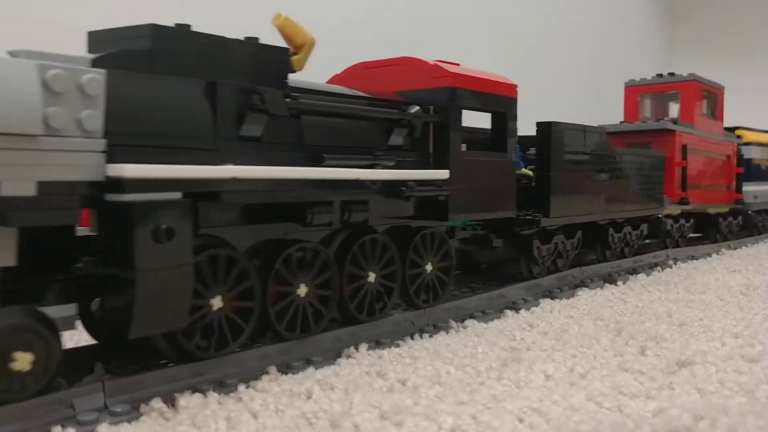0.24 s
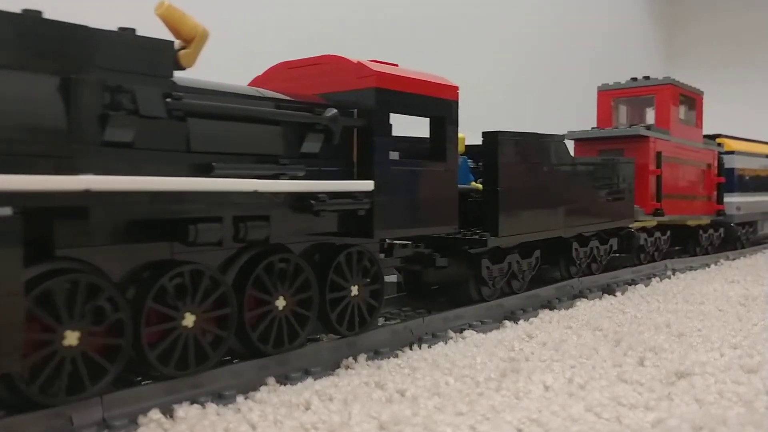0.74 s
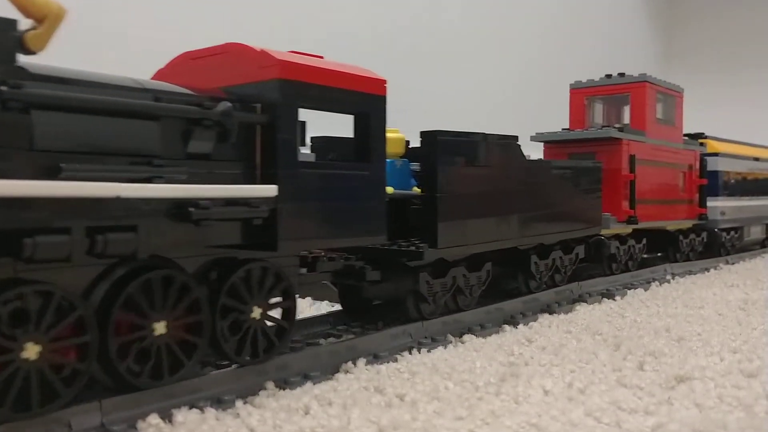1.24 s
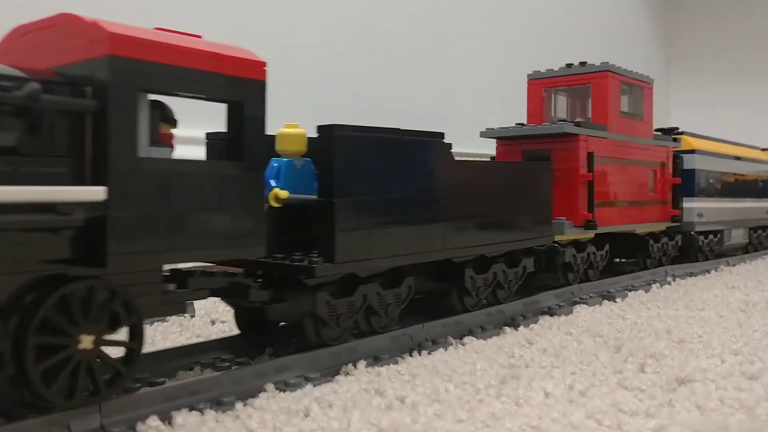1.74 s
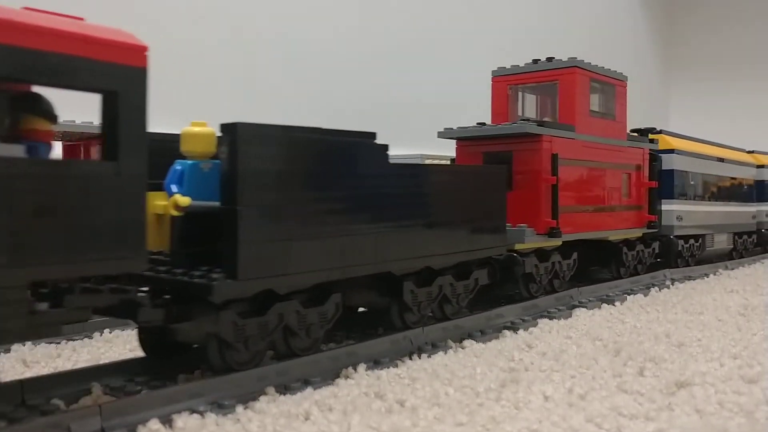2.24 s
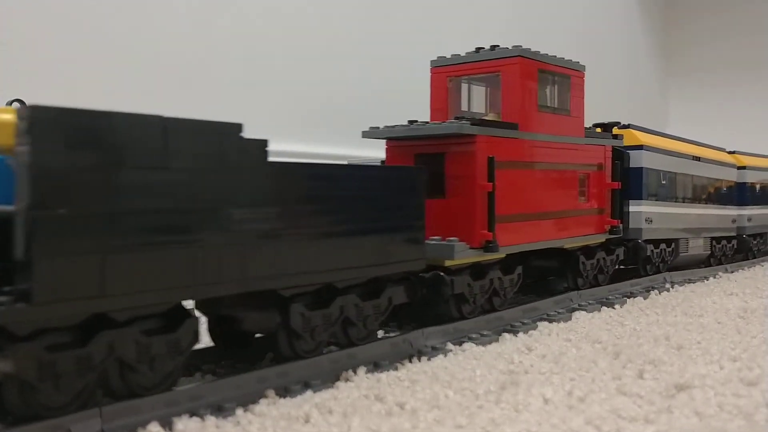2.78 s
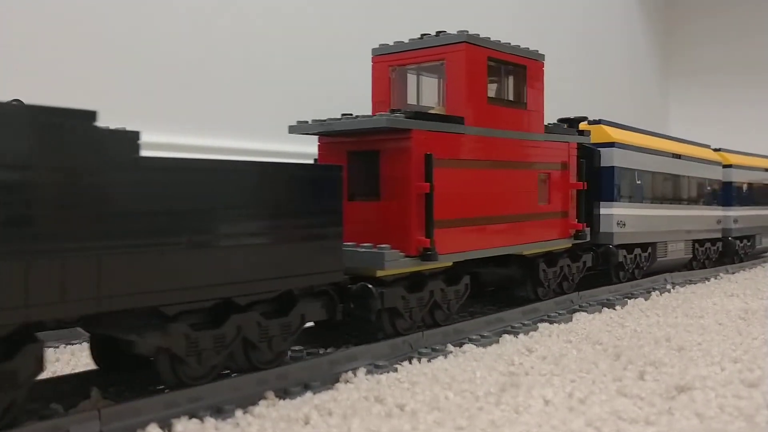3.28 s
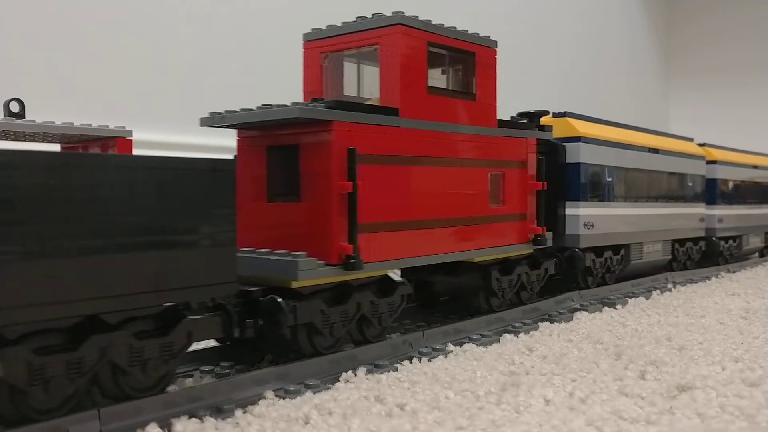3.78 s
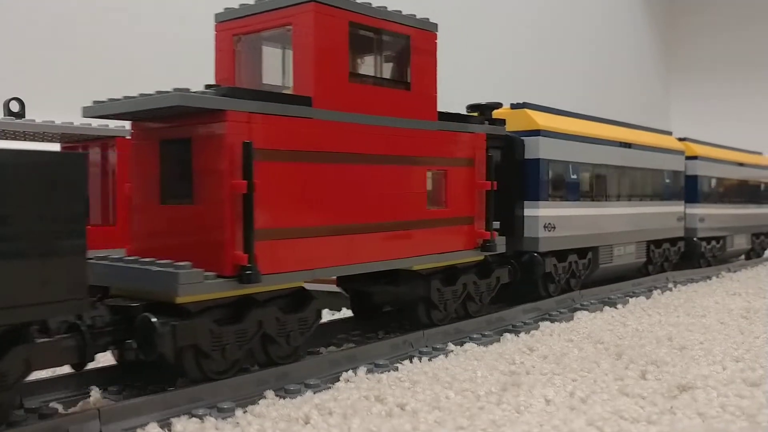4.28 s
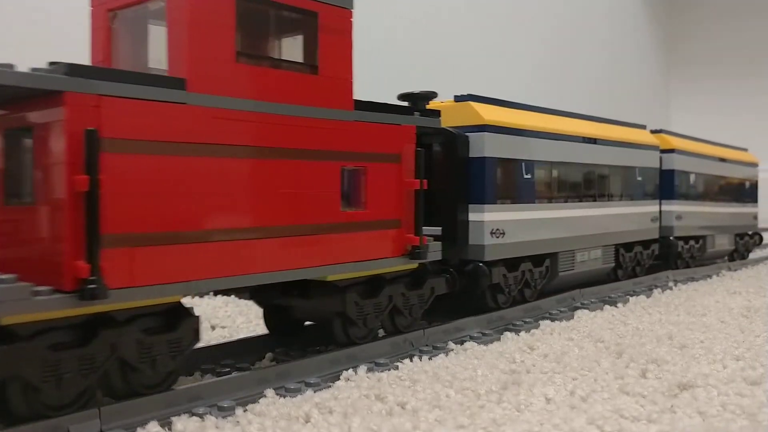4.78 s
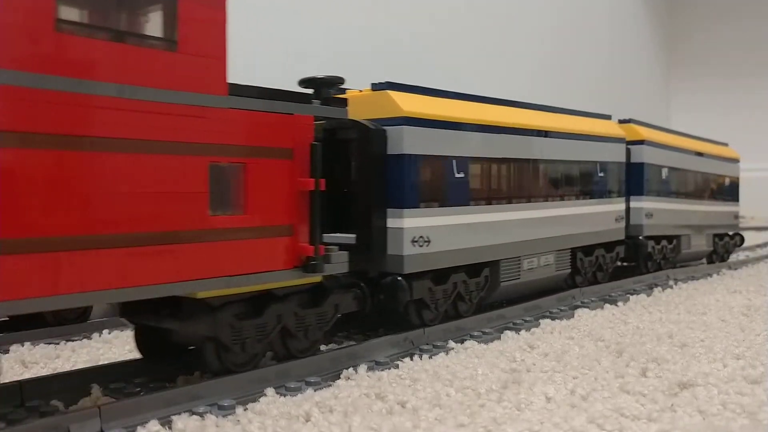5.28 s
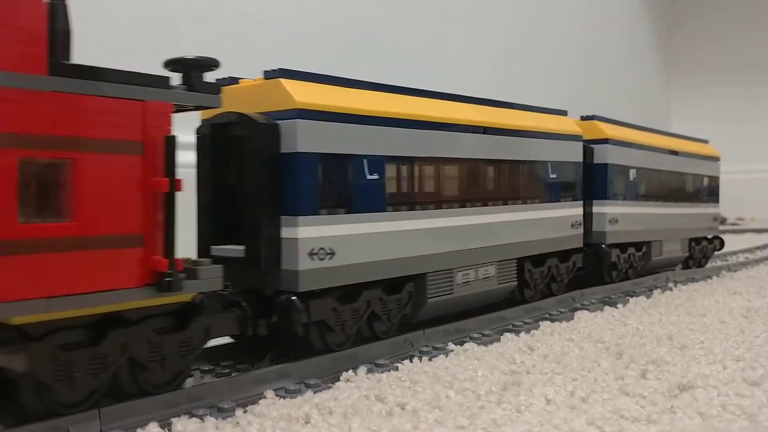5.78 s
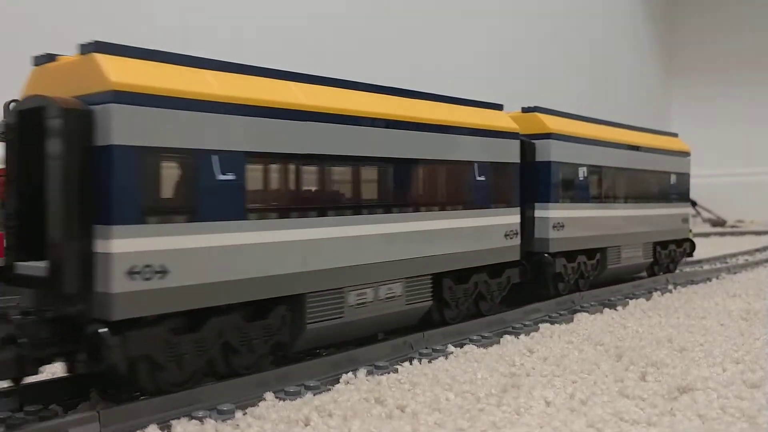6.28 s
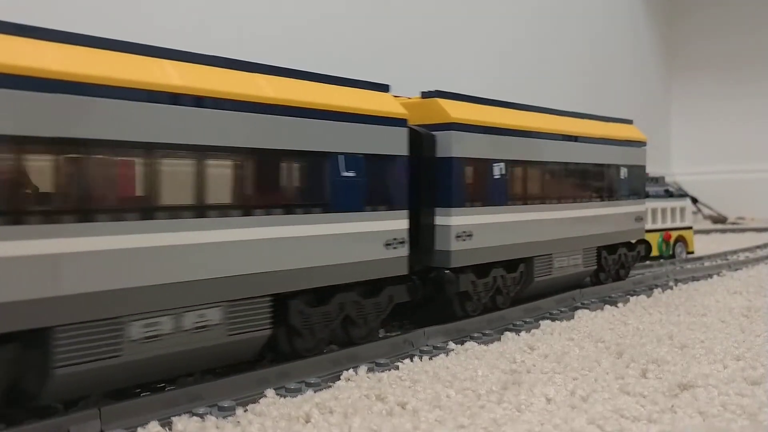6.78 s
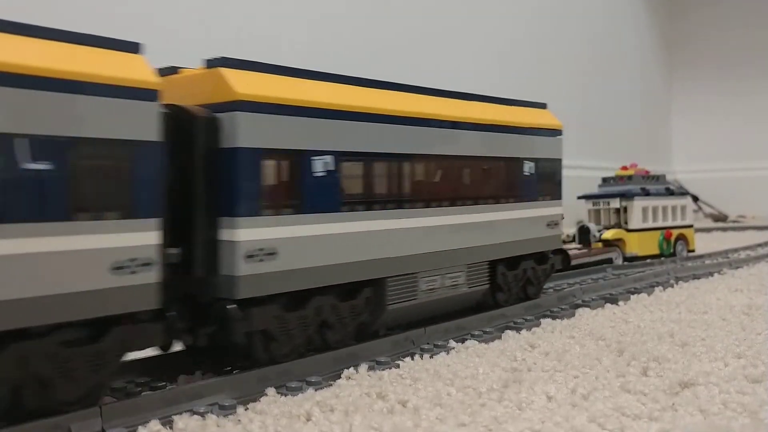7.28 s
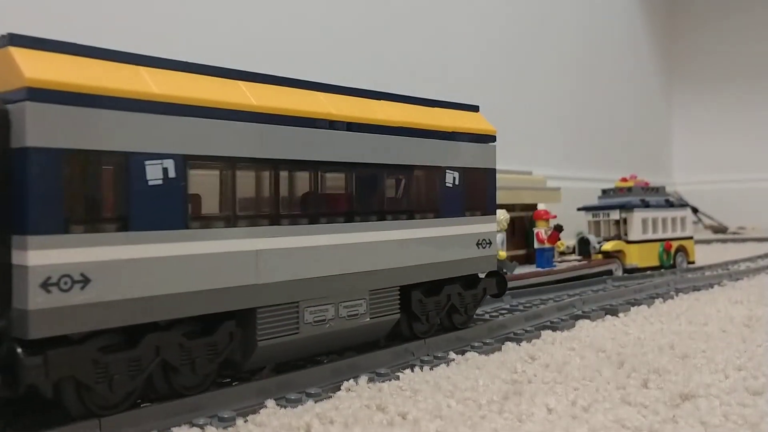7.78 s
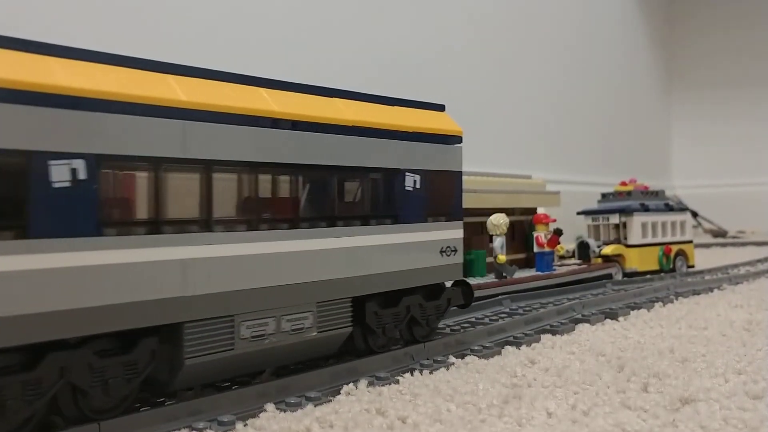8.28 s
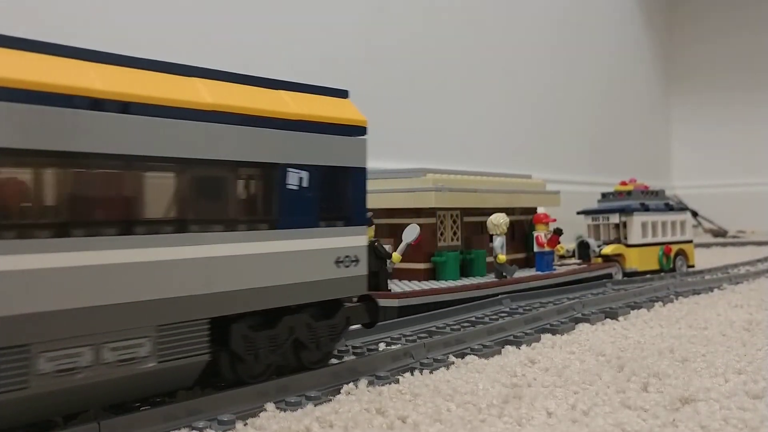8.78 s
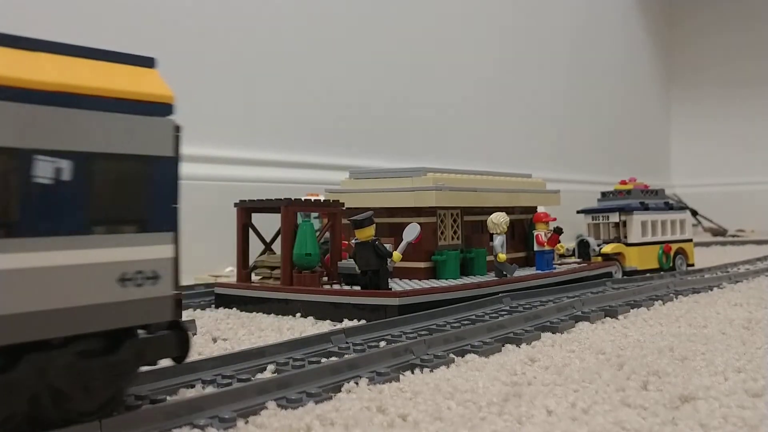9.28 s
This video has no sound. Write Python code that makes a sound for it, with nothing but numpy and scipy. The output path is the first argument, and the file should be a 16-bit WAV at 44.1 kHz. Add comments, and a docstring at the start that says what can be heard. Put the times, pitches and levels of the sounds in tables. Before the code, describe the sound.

A motorised plastic brick train rolls close past a microphone on the carpet of a small room. Wheels grind and patter unevenly, joints knock and clack, and short piercing squeals recur about every half second to second. The first part has low flange chirps; the longer carriages rattle harder, peaking in a bright clatter just after seven seconds, then easing to sparse knocks. One side is clear, the other muffled and rumbly.

```python
"""A toy train of plastic bricks grinds and knocks past, with high squeals and low swooping tones now and then.
Rail roughness, joints and jolts excite the wheels, the hollow bricks and the track, which answer at their own
modes; a dry axle squeals by stick-slip, flanges chirp, scraping wheels rasp, and a thin motor whine lies on
top. Left is an open microphone port on the carpet of a small room, with a low hum and drone in the air; right
is a covered port: the same train muffled, with the rumble and one thump of the floor, and low swooping tones."""
import sys
import numpy as np
from scipy import signal
from scipy.fft import rfft, irfft
from scipy.io import wavfile

SR = 44100
rng = np.random.default_rng(int(sys.argv[2]) if len(sys.argv) > 2 else 0)


def generate_wav(sig):
    """Save sig (samples, or channels by samples) to the path in sys.argv[1] as 16-bit PCM at SR."""
    pcm = np.round(np.clip(np.atleast_2d(sig).T, -1, 1) * 32767).astype(np.int16)
    wavfile.write(sys.argv[1], SR, pcm)


N = 420713
TIME = np.arange(N) / SR

# Levels are relative wherever a source applies a further gain.
# grinding of the wheels on the rails: (time [s], relative level [dB])
ROLLING_LEVEL = [(0.0, -70), (0.29, -71), (0.69, -74.5), (1.03, -70.5), (1.22, -74), (1.59, -65.5),
                 (1.91, -72.5), (2.63, -69), (3.16, -70.5), (3.34, -81), (3.55, -81.5), (3.74, -74),
                 (5.05, -69), (5.34, -66.5), (5.77, -69), (6.06, -68), (6.54, -61.5), (6.75, -63),
                 (6.93, -59.5), (7.17, -55.5), (7.25, -54.5), (7.46, -63), (7.62, -66.5), (7.72, -81),
                 (7.92, -82.5), (8.1, -77.5), (9.11, -66.5), (9.54, -69)]
# wheels meeting joints, couplings and bricks touching:
# (time [s], knock [dB], clack [dB], crack [dB], tick [dB]), all relative
CONTACTS = [(0.0578, -61, -52, -74.5, -99), (0.107, -83, -67.5, -78, -99), (0.471, -73, -80, -85, -78),
            (0.6855, -68, -65, -83, -61), (0.737, -82, -79, -78.5, -76), (0.8228, -65.5, -62, -66, -72),
            (0.8724, -58.5, -76, -57.5, -69.5), (0.9263, -52.5, -60, -68, -58),
            (0.9847, -55.5, -54, -65, -73), (1.095, -75, -66, -88, -99), (1.4862, -54.5, -52.5, -73.5, -69),
            (1.689, -62.5, -58, -82, -99), (1.7333, -57.5, -49, -47.5, -53.5),
            (1.795, -61.5, -58, -78, -99), (1.823, -71, -65, -84, -99), (1.8756, -58.5, -48.5, -46, -56),
            (1.9316, -63.5, -53, -36, -42.5), (1.934, -66, -58, -49, -43), (2.113, -58, -69, -77, -99),
            (2.3865, -64.5, -59, -71, -99), (2.4614, -67, -55, -75, -99), (2.5663, -55, -67, -82, -99),
            (2.7053, -62, -63.5, -73, -99), (2.7624, -47.5, -58, -71, -92), (2.965, -59, -70, -73, -99),
            (3.0423, -69, -66, -58, -79), (3.137, -63, -65, -70, -87), (3.269, -60, -74.5, -88, -99),
            (3.5956, -57, -66, -84, -69), (3.691, -71, -64.5, -86, -99), (3.7388, -66.5, -58.5, -61, -69.5),
            (3.775, -72, -64, -75, -99), (3.8896, -66.5, -63, -72, -84), (3.94, -58.5, -65, -89, -99),
            (4.0212, -56, -78, -66, -69), (4.12, -64, -81, -90, -99), (4.2533, -45, -55, -40.5, -52.5),
            (4.2842, -57.5, -60, -53, -61), (4.3276, -53, -48, -46, -84), (4.427, -61, -63.5, -82, -99),
            (4.4947, -58.5, -67.5, -73, -99), (4.641, -66, -72, -89.5, -99), (4.6798, -53, -76.5, -72, -74),
            (4.7616, -57, -50, -64.5, -57.5), (4.834, -59, -59.5, -73, -73), (4.88, -64, -63, -78, -99),
            (4.916, -58.5, -66, -82, -99), (4.935, -66, -71, -70, -65), (4.987, -54, -63, -64, -86),
            (5.0542, -59, -49, -57, -84), (5.1238, -64, -59, -57, -91), (5.1502, -67.5, -52, -50, -80),
            (5.198, -74, -60, -63, -60), (5.2081, -69, -56, -56, -45.5), (5.3667, -66, -58, -53, -80),
            (5.3902, -56, -48, -64, -73), (5.4138, -56.5, -39.5, -38, -56), (5.715, -61.5, -72, -75, -99),
            (5.7871, -50, -58.5, -68, -88), (5.9284, -56.5, -67, -60.5, -88), (6.0062, -51, -68, -57, -89),
            (6.147, -56, -62, -59, -71), (6.215, -70, -66, -61, -70), (6.322, -55, -54, -61, -74),
            (6.4408, -59.5, -57, -52, -62), (6.4497, -50.5, -50, -43.5, -54.5),
            (6.504, -49.5, -52, -47, -70), (6.531, -53, -51.5, -57, -83), (6.6036, -48, -43.5, -47.5, -64),
            (6.6562, -45.5, -50, -47.5, -62), (6.6826, -68, -57, -48, -55.5), (6.6982, -54, -54, -45, -63),
            (6.8392, -44.5, -56, -42.5, -57.5), (6.8733, -50, -57, -41.5, -62),
            (6.9546, -64, -52, -56, -64.5), (7.087, -52, -55, -47, -56.5), (7.114, -54, -60, -45, -58.5),
            (7.1431, -60, -55.5, -44, -56), (7.1823, -45, -61.5, -42, -69), (7.236, -45.5, -60, -47.5, -59),
            (7.2519, -47, -45, -29.5, -40.5), (7.2583, -55, -50.5, -41, -36.5),
            (7.269, -50, -47, -35, -41.5), (7.284, -50, -53.5, -36, -41.5), (7.3291, -54, -61, -50, -47),
            (7.3635, -46, -51.5, -53, -54), (7.379, -44, -58, -45, -54.5), (7.5187, -52, -62, -61, -82.5),
            (7.5703, -61, -68, -66, -61), (7.5862, -51, -71, -72, -66), (7.9612, -41.5, -62.5, -56, -50.5),
            (7.968, -45.5, -64, -59, -55), (7.9937, -44.5, -60, -54, -72), (8.011, -54, -57, -56, -66),
            (8.28, -91, -96, -88, -71.5), (8.3196, -57.5, -65, -67, -57.5),
            (8.3931, -54.5, -53, -60.5, -74), (8.4959, -62, -57, -55, -61.5),
            (8.515, -57.5, -61.5, -63, -68), (8.6602, -52, -81, -82, -99), (8.705, -58, -58.5, -58.5, -64),
            (8.7325, -46, -47, -42.5, -74), (9.1106, -47, -54, -48, -70.5),
            (9.1591, -48.5, -49.5, -52, -73), (9.2458, -68, -62, -54.5, -63.5),
            (9.3389, -48.5, -62, -45.5, -74), (9.402, -57.5, -62.5, -74, -91), (9.4529, -52, -66, -59, -95)]
# a bogie jolts and its parts shudder: (time [s], body level [dB], bright level [dB], decay time [s])
CLATTERS = [(0.824, -58.5, -84, 0.077), (0.928, -50, -56, 0.046), (1.42, -54.5, -85.5, 0.056),
            (1.516, -53, -95, 0.055), (2.14, -60, -94, 0.13), (2.399, -59.5, -65, 0.051),
            (2.455, -57, -74.5, 0.013), (2.764, -48.5, -69, 0.014), (2.85, -50, -59.5, 0.019),
            (3.566, -57, -85, 0.12), (3.74, -67, -63, 0.038), (4.257, -55, -49.5, 0.076),
            (4.748, -58, -54, 0.043), (4.934, -65, -61, 0.066), (5.054, -70, -62, 0.015),
            (5.15, -73, -61, 0.035), (5.198, -63, -53, 0.074), (5.409, -46.5, -44.5, 0.014),
            (6.321, -54.5, -61, 0.13), (6.451, -52.5, -58, 0.067), (6.702, -58, -56, 0.058),
            (6.955, -50.5, -56, 0.25), (7.257, -44.5, -29.5, 0.049), (7.355, -43.5, -57, 0.036),
            (7.927, -58, -96, 0.041), (7.962, -54.5, -56, 0.041), (8.115, -44.5, -84, 0.0035),
            (8.322, -60.5, -57.5, 0.12), (8.447, -51, -61, 0.046), (8.725, -45.5, -50, 0.015),
            (8.911, -57, -64, 0.11), (9.159, -66, -60, 0.028), (9.244, -61, -59, 0.059),
            (9.339, -66, -72, 0.073)]
# a carriage drops onto a hollow piece of track: (time [s], relative level [dB], pitch [Hz])
THUDS = [(2.569, -49.5, 1227), (2.867, -49, 700), (6.655, -43, 431), (6.699, -36.5, 389),
         (6.741, -42.5, 446), (7.606, -46, 248), (7.965, -41, 1210), (7.996, -46, 900), (8.117, -57.5, 338),
         (8.732, -51, 1260)]
# a wheel scrapes along the side of the rail:
# (start [s], length [s], relative level [dB], relative edge level [dB])
RASPS = [(0.197, 0.026, -64.5, -87.5), (0.333, 0.045, -67.5, -94), (0.83, 0.08, -67, -73.5),
         (0.921, 0.047, -61.5, -69.5), (1.161, 0.027, -67, -96), (1.411, .055, -58.5, -87.5),
         (1.555, 0.034, -58.5, -89), (2.119, 0.015, -66, -81), (2.197, 0.026, -68, -96),
         (2.299, .045, -65.5, -89.5), (2.393, 0.02, -72, -78.5), (2.467, 0.02, -61.5, -88),
         (2.71, 0.035, -71, -75), (2.765, 0.043, -72, -69.5), (2.84, 0.017, -81, -76),
         (3.263, 0.015, -86, -90), (3.59, 0.039, -72, -97), (4.748, 0.054, -71, -81),
         (5.05, 0.023, -59, -64.5), (5.14, 0.045, -68.5, -70), (5.382, 0.063, -59, -66),
         (5.46, 0.043, -59.5, -72), (6.008, 0.042, -62, -76), (6.302, 0.044, -60, -68.5),
         (6.38, 0.028, -56.5, -61.5), (6.992, 0.043, -54.5, -61), (8.462, 0.081, -70, -76),
         (8.898, 0.06, -63, -72)]
# wheel flanges chirping on the rail: (time [s], pitch [Hz], relative level [dB])
CHIRPS = [(0.443, 1866, -59), (0.606, 1850, -60), (.755, 1670, -69), (0.823, 2150, -51.5),
          (0.975, 1680, -56), (1.162, 1970, -63), (1.244, 1630, -54.5), (1.318, 1620, -54.5),
          (1.508, 1680, -53), (2.207, 1590, -51), (2.458, 1520, -56.5), (2.474, 3530, -68.5),
          (2.864, 1570, -56), (3.092, 1740, -60.5), (6.033, 1540, -59), (6.296, 1620, -49.5),
          (7.264, 3500, -34)]
# axle squeals: (start [s], length [s], relative amplitude [dB], settled pitch [Hz],
# extra pitch at the start [Hz], rise time [s], unsteadiness of level and pitch [0 = even, 1 = uneven])
SQUEALS = [(-.04, 0.037, -19.5, 9090, 119, .004, 0.03), (0.384, 0.085, -78, 9760, 21, .012, 0.6),
           (0.831, 0.04, -20, 9090, 149, 0.0055, 0.1), (1.504, 0.03, -17.5, 9100, 91, 0.0021, 0.34),
           (2.182, 0.028, -33, 9070, 140, 0.0045, 1.04), (2.762, 0.066, -33.5, 9130, 177.6, 0.0012, 0.76),
           (3.523, 0.05, -29, 9100, 98, 0.0053, 0.52), (4.278, 0.037, -45, 9130, 88, 0.0042, 0.68),
           (5.287, 0.068, -28, 9085, 100, 0.0021, 0.46), (5.928, 0.08, -31, 9087, 223, 0.0046, 0.28),
           (6.467, 0.015, -27.5, 9070, 52, 0.0014, 0.55), (6.84, 0.039, -36, 9040, 67, 0.0036, 0.6),
           (7.147, 0.054, -32, 9040, 134, 0.0019, 0.34), (7.808, 0.071, -47, 9170, 98.2, 0.0071, 0.83),
           (9.412, 0.024, -68.5, 9070, 60, 0.004, 0.7)]
# dry axle rubbing: (time [s], relative level [dB])
AXLE_LEVEL = [(0, -79), (.3, -88), (.55, -74), (.9, -69), (1.15, -82), (1.7, -71.5), (2.5, -74.5),
              (2.68, -83), (2.9, -74), (3.4, -105), (3.7, -76), (4.2, -87.5), (4.4, -80), (5.4, -74),
              (5.7, -90), (6.3, -70), (7.25, -75), (7.7, -105), (9.54, -100)]
# low hum: (time [s], relative level [dB])
HUM_LEVEL = [(0, -71.5), (1.3, -69.5), (2.2, -66.5), (2.35, -80), (2.85, -88), (3.15, -71.5), (3.6, -63),
             (4.1, -75.5), (4.4, -70), (5.0, -69.5), (5.5, -94), (9.54, -100)]
# partials of the low hum: (mean frequency [Hz], relative level [dB])
HUM_PARTIALS = [(91.5, -6), (120, -9), (150.7, -2), (177.6, 0.5)]
# low drone in the air: (time [s], relative level [dB])
AIR_DRONE_LEVEL = [(0, -69), (2.2, -65), (2.65, -87.5), (3.05, -68), (3.7, -71.5), (4.15, -77.5),
                   (4.35, -74), (4.85, -68), (5.2, -76), (5.8, -72), (6.0, -79.5), (6.7, -66),
                   (7.35, -56.5), (7.72, -68.5), (8.0, -74), (8.25, -81), (8.47, -59), (9.0, -75),
                   (9.54, -63)]
# a low tone swoops now and then on the covered side: # (start [s], length [s], level [dB], first pitch [Hz],
# middle pitch [Hz], last pitch [Hz])
GROANS = [(-.01, 0.073, -54.5, 165, 118, 192), (.095, 0.071, -57, 201, 138, 212),
          (.18, 0.075, -53.5, 185, 155, 200), (.26, 0.11, -55.5, 183, 118.7, 212),
          (.42, 0.087, -60.5, 239, 160, 161), (.515, 0.11, -59, 177, 122.6, 225),
          (1.23, .18, -61, 121, 128, 190), (1.47, .11, -59, 172.4, 124.7, 110),
          (1.61, 0.068, -61.5, 146, 112.6, 110), (2.79, 0.13, -57.5, 108, 125, 85),
          (3.0, 0.086, -61.5, 135, 110, 90), (3.095, 0.093, -56, 119, 163, 107),
          (6.27, 0.12, -56.5, 94.8, 112, 129), (6.41, .22, -59.5, 114, 111.5, 158),
          (6.66, 0.15, -59.5, 213, 141, 190), (6.8, 0.108, -55, 191, 139, 100),
          (7.68, 0.1, -56.5, 130, 121, 99), (7.85, 0.035, -58.5, 187, 160, 126),
          (8.1, 0.078, -59, 125, 104, 127), (8.26, 0.047, -57.5, 139.4, 113, 120),
          (8.34, 0.036, -60, 161, 150, 160), (8.42, 0.16, -58.5, 150, 147, 121),
          (9.28, 0.19, -63, 113.3, 100.8, 123.5)]

# modes of the engine's and tender's bricks, which pass first: (frequency [Hz], width [Hz], relative gain [dB])
ENGINE_MODES = [(1070, 85, 1.5), (1559, 60, -1.5), (1750, 60, -0.5), (2170, 120, 3), (2930, 140, -4.5),
                (3650, 120, -1), (4600, 120, 8.5), (5964, 110, 5.5), (6560, 110, 5), (6970, 70, 2),
                (7210, 73, 4), (7640, 75, 2), (8710, 110, 5.5)]
# modes of the carriages' bricks: (frequency [Hz], width [Hz], relative gain [dB])
CARRIAGE_MODES = [(1117, 35, 2), (1480, 60, -4), (2200, 200, 0), (3040, 50, 6), (3400, 65, 4),
                  (3632, 65, 4), (3800, 90, 2), (4650, 170, -3), (5396, 45, 3), (6312, 50, 3),
                  (7627, 45, 5), (9941, 25, 4), (10266, 60, 7), (11014, 35, 6)]
# hollow ring of the track under a knock: (frequency [Hz], width [Hz], relative gain [dB])
TRACK_MODES = [(423, 44, -6.5), (490, 22, -2), (696, 35, -2.5), (950, 65, -9), (1201, 40, -2),
               (2190, 83, -13.5)]

# spectrum of the grinding wheels and their taps: (frequency [Hz], relative level [dB])
ROLL_COLOUR = [(30, -33), (100, -16), (220, -3.5), (340, 3), (440, 5), (620, 1), (900, -2), (1300, -5),
               (2100, -11.5), (2700, -18.5), (3600, -43.5), (6000, -41)]
# spectrum of rattling bricks: (frequency [Hz], relative level [dB])
RATTLE_COLOUR = [(200, -33.5), (1200, -0.5), (2500, -2.5), (3600, -1), (4600, -1.5), (6000, -1.5),
                 (8000, 3), (10000, 7.5), (12500, -2.5), (16000, -10.5)]
# spectrum of a jolted body: (frequency [Hz], relative level [dB])
CLATTER_COLOUR = [(40, -38), (150, -1), (300, 4), (500, 7), (800, 1), (1120, 1), (1500, -8.5), (2100, -9.5),
                  (3000, -28.5), (6000, -43)]
# spectrum of a scraping wheel: (frequency [Hz], relative level [dB])
RASP_COLOUR = [(500, -26.5), (1200, 1), (1700, 5.5), (2400, -0.5), (3000, -13), (4500, -32)]
# spectrum of the scraping edge: (frequency [Hz], relative level [dB])
RASP_EDGE_COLOUR = [(1500, -22), (2900, -2), (3900, 5), (5000, -5.5), (6500, -14), (9000, -21.5)]
# spectrum of the axle's hiss: (frequency [Hz], relative level [dB])
AXLE_COLOUR = [(6500, -34.5), (8200, -8.5), (9100, 2), (9750, 4.5), (10400, 3), (11000, -16), (13000, -15),
               (16000, -20.5)]
# spectrum of the diffuse echoes: (frequency [Hz], gain [dB])
ROOM_COLOUR = [(100, -9), (400, 3), (1500, -9.5), (5000, 3.5), (10000, -7), (16000, 1)]
# transmission into the covered port: (frequency [Hz], relative gain [dB])
COVERED_PORT = [(40, -12), (200, -9), (300, -15), (420, -22), (580, -29), (760, -39), (1200, -33),
                (2200, -41), (3400, -37), (6000, -48), (9000, -53), (16000, -56)]
# spectrum of the drone in the air: (frequency [Hz], relative level [dB])
AIR_DRONE_COLOUR = [(25, -27), (45, -22), (80, 8.5), (125, 4.5), (175, 8), (230, -4.5), (400, -49)]
# spectrum of the floor's rumble: (frequency [Hz], relative level [dB])
FLOOR_RUMBLE_COLOUR = [(25, -36), (50, -12), (80, -0.5), (115, 3), (155, -9), (210, -5), (290, -19.5),
                       (400, -38.5), (600, -42), (1500, -46)]
# spectrum of grinding felt through the floor: (frequency [Hz], relative level [dB])
FLOOR_GRIND_COLOUR = [(150, 4), (240, 9.5), (400, -5), (480, -14.5), (570, -14), (720, -30.5), (1300, -28),
                      (2500, -41)]
# spectrum of the steady hiss: (frequency [Hz], relative level [dB])
HISS_COLOUR = [(30, 13), (200, 8), (700, 3.5), (2500, 1.3), (9000, 1.8), (16000, 0.5)]

# loose bricks rattle by this much at the usual rolling level, and gain RATTLE_GROWTH dB per dB of rolling
USUAL_ROLL_DB, RATTLE_DB, RATTLE_GROWTH = -69, -91.5, 2.9
# lighter touches come at random; their components lie this far above the rolling level
TOUCHES_PER_S, TOUCH_SPREAD_DB = 4.5, 6.5
TOUCH_KNOCK_DB, TOUCH_CLACK_DB, TOUCH_CRACK_DB, TOUCH_TICK_DB = 1.5, -6, -13, -22
HANDOVER_S = 4.6  # the engine and tender give way to the carriages
# axle rub after a squeal: offset from the squeal's tabled amplitude, then decay time
AFTER_SQUEAL_DB, AFTER_SQUEAL_S = -38.5, 0.055
MOTOR_WHINE_HZ = 11780  # mean pitch
# the floor shakes with the rolling (dB per dB), and more once the long coaches arrive
FLOOR_DB, FLOOR_FOLLOWS, COACHES_S, COACHES_DB = -76.5, 0.54, 6.2, 4
GROAN_EDGE_S = .02
CUTOFF_HZ = 16050


def wheels(flutter_db=3.5, chatter_db=0.5, roll_db=4.5, lumps_db=3.0, bursts_db=6.0,
           hard_db=-64, soft_hz=4200, light_db=-75, light_hz=700):
    """Roughness excitation: rails shake the wheels, dull under light rolling; bricks chatter brighter if shaken harder."""
    roll = gains_in_time(ROLLING_LEVEL)[0] * flicker(11, lumps_db)
    rattle = from_db(RATTLE_DB + RATTLE_GROWTH * effort_db()) * flicker(19, bursts_db)

    grind = shower(220, 250, 3200, sharpness=10, patchy_db=5.5, count=20) * flicker(30, flutter_db)
    grind = rms_one(colour(grind, ROLL_COLOUR)) + wheel_taps()
    dull = lowpass(grind, 1, light_hz)
    pressure = roll ** 2 / (roll ** 2 + from_db(light_db) ** 2)
    grind = pressure * grind + (1 - pressure) * dull

    chatter = shower(800, 2100, 15000, sharpness=9, patchy_db=7.5, count=12) * flicker(35, chatter_db)
    chatter = rms_one(colour(brick_body(chatter, direct=3.2), RATTLE_COLOUR))
    soft = lowpass(chatter, 4, soft_hz)
    hardness = rattle / (rattle + from_db(hard_db))
    chatter = hardness * chatter + 2 * (1 - hardness) * soft
    return from_db(roll_db) * roll * grind + rattle * chatter


def wheel_taps(level_db=-4.0, per_s=150, spread_db=3.5, track_db=0.0, pitched_db=-7,
               pitched_per_s=7, sharpness=14, tilt_db=-2.5, count=10):
    """Impulse excitation: wheels patter unevenly, the hollow track rings, loose wheels tap at their own pitch."""
    taps = colour(grains(per_s, spread_db), ROLL_COLOUR)
    taps = taps + sum(resonance(taps * from_db(db + track_db), hz, width) for hz, width, db in TRACK_MODES)
    pitches = np.geomspace(480, 2300, count)
    pitched = np.zeros(N)
    for hz in pitches:
        tap = resonance(grains(pitched_per_s, 1.4), hz, hz / 2)
        tap = rms_one(resonance(tap, hz, hz / sharpness))
        pitched += from_db(tilt_db * np.log2(hz / pitches[0])) * tap  # tilt in dB per octave
    return from_db(level_db) * rms_one(taps) + from_db(pitched_db) * rms_one(pitched)


def contacts(knock_gain_db=-3.5, clack_gain_db=-6.0, crack_gain_db=-14.5, tick_gain_db=5.0, ring_db=2.0):
    """Impact: each contact joins a track knock, a wheel clack, a dry body crack and a tick of hard edges."""
    s, knock_db, clack_db, crack_db, tick_db = np.vstack([CONTACTS, touches()]).T
    knock = blows(s, knock_db + knock_gain_db, 170, 1500, 0.0046, order=3)
    knock = knock + sum(resonance(knock * from_db(db + ring_db) * flicker(5.4, 8.9), hz, width)
                        for hz, width, db in TRACK_MODES)
    clack = blows(s, clack_db + clack_gain_db, 1100, 3100, 0.0037, own_ring_db=10.5, sharpness=12, order=3)
    crack = blows(s, crack_db + crack_gain_db, 2600, 5400, 0.003, own_ring_db=3.5, sharpness=18, order=2)
    tick = blows(s, tick_db + tick_gain_db, 6750, 15000, 0.0023, order=3)
    return .4 * brick_body(knock + clack + crack + tick, direct=2.5)


def touches(count=90):
    """Random light contacts scale with rolling: rows (time [s], knock, clack, crack, tick [dB])."""
    s = np.cumsum(rng.uniform(.2, 1.8, count)) / TOUCHES_PER_S
    rolling_db = np.interp(s, *np.transpose(ROLLING_LEVEL))[:, None]
    levels = rolling_db + TOUCH_SPREAD_DB * rng.standard_normal((count, 4))
    return np.column_stack([s, levels + [TOUCH_KNOCK_DB, TOUCH_CLACK_DB, TOUCH_CRACK_DB, TOUCH_TICK_DB]])


def blows(times, levels_db, low_hz, high_hz, decay_s, own_ring_db=5.0, sharpness=6, order=2, size=2048):
    """Impact response: a decaying burst of noise in one band, plus two pitches of the part that is touched."""
    band = signal.butter(order, [low_hz, min(high_hz, .45 * SR)], "band", fs=SR, output="sos")
    t = np.arange(size) / SR
    press = 1 - np.exp(-t / .0006)
    force = rng.standard_normal((len(times), size)) * press * np.exp(-t / decay_s)
    bursts = signal.sosfilt(band, force)
    pitches = low_hz * (high_hz / low_hz) ** rng.uniform(.15, .85, (len(times), 2))
    out = np.zeros(N + size)
    for s, burst, db, own in zip(times, bursts, levels_db, pitches):
        burst = burst + from_db(own_ring_db) * sum(resonance(burst, hz, hz / sharpness) for hz in own)
        at = min(round(s * SR), N)
        strength = np.sqrt(np.sum(burst ** 2) / (.01 * SR))  # energy as an rms over 10 ms
        out[at:at + size] += from_db(db) * burst / strength
    return out[:N]


def thuds(level_db=7.5, rise_s=0.001, decay_s=0.0036):
    """Damped oscillation: the hollow track answers a dropping carriage with a short pitched thud."""
    return sum(fading([(s, db + level_db, decay_s)], rise_s) * np.sin(2 * np.pi * hz * (TIME - s))
               for s, db, hz in THUDS)


def clatters(rise_s=0.0013, hard_db=-64, soft_hz=4600, soft_db=-2.5, clumps_db=3.0):
    """Repeated impact: a jolt starts a dying shower of small hits, its bright part clumped and duller if gentle."""
    body = rms_one(colour(brick_body(grains(3000, 5.5), direct=5.0), CLATTER_COLOUR))
    hits = grains(4000, 3.0) * flicker(70, clumps_db)
    bright = rms_one(colour(brick_body(hits, direct=0.82), RATTLE_COLOUR))
    soft = from_db(soft_db) * lowpass(bright, 3, soft_hz)
    s, body_db, bright_db, decay_s = np.transpose(CLATTERS)
    shake = fading(zip(s, bright_db, decay_s), rise_s)
    hardness = shake / (shake + from_db(hard_db))
    body_part = body * fading(zip(s, body_db, decay_s), rise_s)
    return body_part + shake * (hardness * bright + (1 - hardness) * soft)


def rasps(rise_s=.003, release_s=.009, grains_per_s=2200, judder_db=2.5, direct=0.23, width_hz=190):
    """Friction as dense catch-and-slip grains: body and brighter edge excite fresh wheel pitches in each scrape."""
    body, edge = [rms_one(colour(grains(grains_per_s, 2.7), c)) for c in (RASP_COLOUR, RASP_EDGE_COLOUR)]
    out = np.zeros(N)
    for start, length, db, edge_db in RASPS:
        near = (TIME > start) & (TIME < start + .25)
        t = TIME[near] - start
        swell = (1 - np.exp(-t / rise_s)) * np.exp(-np.maximum(t - length, 0) / release_s)
        scrape = from_db(db) * body[near] + from_db(edge_db) * edge[near]
        pitches = np.geomspace(1500, 5600, 6) * rng.uniform(.9, 1.1, 6)
        ring = sum(resonance(scrape, hz, width_hz) for hz in pitches)
        out[near] += swell * (direct * scrape + ring)
    return out * flicker(70, judder_db)


def chirps(rise_s=.003, decay_s=0.014, width_hz=420, level_db=2):
    """Friction noise through a resonance: a flange rubs the rail briefly in a rough squeak around one pitch."""
    out, friction = np.zeros(N), rng.standard_normal(N)
    for s, hz, db in CHIRPS:
        near = (TIME > s) & (TIME < s + .12)
        t = TIME[near] - s
        squeak = resonance(friction[near], hz, width_hz)
        squeak = rms_one(resonance(squeak, hz, width_hz))
        out[near] += from_db(db + level_db) * (1 - np.exp(-t / rise_s)) * np.exp(-t / decay_s) * squeak
    return out


def squeals(ring_s=0.014, settle_s=0.028, waver_hz=60, dip_db=13.0, level_db=4.0):
    """Stick-slip builds up one pure wheel mode, which sags in pitch and rings out when the axle lets go."""
    out = np.zeros(N)
    # some squeals hold evenly; others dip in level and waver in pitch
    dips, wobble = np.tanh(drift(68)), waver_hz * drift(160.0)
    for start, length, db, hz, extra_hz, rise_s, unsteady in SQUEALS:
        near = (TIME > start - .05) & (TIME < start + .3)
        t = TIME[near] - start
        swell = np.exp(-np.maximum(t - length, 0) / ring_s) / (1 + np.exp(-t / rise_s))
        pitch = hz + 2 * extra_hz / (1 + np.exp(2 * t / settle_s)) + unsteady * wobble[near]
        gain = from_db(db + unsteady * dip_db * (dips[near] - .5))
        out[near] += gain * swell * sine(pitch)
    fade_in = np.tanh(TIME / .001) ** 2
    return from_db(level_db) * out * fade_in


def axle_rub(flutter_db=3.0, stutter_db=6, hiss_db=-5, whistle_db=-4, whistle_hz=9750, wander_hz=260, scatter_hz=110):
    """Dry friction hisses in a stutter, with a hoarse wandering whistle above the squealing mode."""
    after = fading([(start, db + AFTER_SQUEAL_DB, AFTER_SQUEAL_S) for start, _, db, *_ in SQUEALS], 0.0069)
    pitch = whistle_hz + wander_hz * drift(2.9) + scatter_hz * drift(220)
    whistle = np.sqrt(2) * drift(50) * sine(pitch)
    rub = from_db(hiss_db) * noise(AXLE_COLOUR) + from_db(whistle_db) * whistle
    strength = gains_in_time(AXLE_LEVEL)[0] + after
    return strength * rub * from_db(flutter_db * drift(8.9)) * flicker(45, stutter_db)


def motor(level_db=-82.5, wander_hz=55, jitter_hz=60, flutter_db=5.0):
    """Frequency and amplitude modulation give the electric drive its thin, unsteady whine."""
    pitch = MOTOR_WHINE_HZ + wander_hz * drift(0.45) + jitter_hz * drift(150)
    return from_db(level_db) * flicker(16, flutter_db) * np.sqrt(2) * sine(pitch)


def brick_body(force, direct=.7):
    """Modal response: a push rings the hollow vehicle in front, each mode with a wandering strength of excitation."""
    out, handover = direct * force, int(HANDOVER_S * SR)
    for modes, near in ((ENGINE_MODES, slice(0, handover)), (CARRIAGE_MODES, slice(handover, N))):
        for hz, width, db in modes:
            push = force[near] * from_db(db - 4) * flicker(14, 6)[near]
            out[near] += resonance(push, hz, width)
    return out


def shower(per_s, low_hz, high_hz, sharpness, patchy_db, count=12):
    """Random impacts on parts of many sizes, each resonating at its own pitch with its own bursts of activity."""
    return sum(resonance(grains(per_s, 2.1) * flicker(35, patchy_db), hz, hz / sharpness)
               for hz in np.geomspace(low_hz, min(high_hz, .4 * SR), count))


def room(x, t60=0.23, wet_db=-9.5, first_echo_s=0.0039, size=30000):
    """Reverberation: diffuse, exponentially decaying wall echoes follow the direct sound."""
    t = np.arange(size) / SR
    tail = rng.standard_normal(size) * from_db(-60 * t / t60) * np.clip(t / first_echo_s - 1, 0, 1)
    echoes = signal.oaconvolve(x, tail / np.sqrt(np.sum(tail ** 2)))[:N]
    return x + from_db(wet_db) * colour(echoes, ROOM_COLOUR)


def floor_rumble(grind_db=-3, swell_db=13.5, flutter_db=3.5):
    """Structure-borne vibration: rumble and dull grinding travel through the floor, with swooping groans."""
    level_db = FLOOR_DB + FLOOR_FOLLOWS * effort_db() + COACHES_DB * (TIME > COACHES_S)
    strength = from_db(level_db) * flicker(4.6, swell_db)
    grind_level = np.sqrt(gains_in_time(ROLLING_LEVEL)[0] * strength)
    grind = from_db(grind_db) * grind_level * noise(FLOOR_GRIND_COLOUR)
    flutter = from_db(flutter_db * drift(21.0))
    return flutter * (strength * noise(FLOOR_RUMBLE_COLOUR) + grind) + groans()


def groans(waver_hz=6, rough=0.51):
    """Frequency glide: a low, slightly rough tone swells, swoops along one arc of pitch and fades."""
    out, rumble, waver = np.zeros(N), noise(FLOOR_RUMBLE_COLOUR), waver_hz * drift(25)
    for start, length, db, *pitches in GROANS:
        on = (TIME > start - GROAN_EDGE_S / 2) & (TIME < start + length + GROAN_EDGE_S / 2)
        t = TIME[on] - start
        swell = np.clip(np.minimum(t, length - t) / GROAN_EDGE_S + .5, 0, 1)
        arc = np.polyval(np.polyfit([0, .5, 1], pitches, 2), np.clip(t / length, 0, 1))
        tone = np.sqrt(2) * sine(arc + waver[on])
        out[on] += from_db(db) * swell * (tone + rough * rumble[on])
    return out


def thump(at_s=7.473, hz=82, upper_hz=140, swell_s=0.021, level_db=-43, upper_db=0.0):
    """Two-mode transient: the track rocks once under a carriage and thumps the floor."""
    t = np.maximum(TIME - at_s, 0)
    modes = np.sin(2 * np.pi * hz * t) + from_db(upper_db) * np.sin(2 * np.pi * upper_hz * t)
    swell = (t / swell_s * np.exp(1 - t / swell_s)) ** 2
    return from_db(level_db) * swell * modes


def hum(waver_db=1.0, waver_hz=1.0):
    """Superposition: a few low partials of wavering pitch make a soft hum that dips and finally fades."""
    partials = sum(from_db(db) * sine(hz + waver_hz * drift(2.2)) for hz, db in HUM_PARTIALS)
    return gains_in_time(HUM_LEVEL)[0] * from_db(waver_db * drift(2.2)) * partials


def air_drone(level_db=-4.0):
    """Band-shaped noise of varying level gives the low drone in the air."""
    return gains_in_time(AIR_DRONE_LEVEL)[0] * from_db(level_db) * noise(AIR_DRONE_COLOUR)


def hiss(level_db=-86):
    """Broadband noise gives each channel its own steady hiss."""
    return from_db(level_db) * noise(HISS_COLOUR)


def effort_db():
    """Level difference: how far the rolling is above its usual level."""
    return np.interp(TIME, *np.transpose(ROLLING_LEVEL)) - USUAL_ROLL_DB


def from_db(db):
    """Decibels to amplitude ratio."""
    return 10 ** (np.asarray(db) / 20)


def rms_one(x):
    """Normalisation to an rms of 1."""
    return x / np.sqrt(np.mean(x ** 2) + 1e-20)


def gains_in_time(rows):
    """Linear interpolation in dB: one gain curve for each level column."""
    s, *columns = np.transpose(rows)
    return [from_db(np.interp(TIME, s, c)) for c in columns]


def sine(pitch_hz):
    """Phase is the running integral of frequency."""
    return np.sin(2 * np.pi * np.cumsum(pitch_hz) / SR)


def lowpass(x, order, hz):
    """Butterworth low-pass filter: treble is removed smoothly."""
    return signal.sosfilt(signal.butter(order, hz, fs=SR, output="sos"), x)


def resonance(x, hz, width_hz):
    """Two-pole resonance with a gain of about 1 at its peak."""
    r = np.exp(-np.pi * width_hz / SR)
    zeros = np.array([1, 0, -1]) * (1 - r * r) / 2
    poles = [1, -2 * r * np.cos(2 * np.pi * hz / SR), r * r]
    return signal.lfilter(zeros, poles, x + 1e-18)


def colour(x, spectrum, size=4096):
    """Causal minimum-phase filter, built by folding the cepstrum of the given spectrum."""
    hz, level_db = np.transpose(spectrum)
    grid = np.maximum(np.arange(size // 2 + 1) * SR / size, 1)
    cepstrum = irfft(np.log(from_db(np.interp(np.log(grid), np.log(hz), level_db))))
    cepstrum[1:size // 2] *= 2
    cepstrum[size // 2 + 1:] = 0
    return signal.oaconvolve(x, irfft(np.exp(rfft(cepstrum))))[:N]


def noise(spectrum):
    """Filtered white noise, rms 1."""
    return rms_one(colour(rng.standard_normal(N), spectrum))


def grains(per_s, spread_db):
    """Random point process: tiny impacts of either sign, a few much stronger than the rest."""
    at = np.flatnonzero(rng.random(N, dtype=np.float32) < per_s / SR)
    strength = from_db(spread_db * np.minimum(rng.exponential(1, len(at)), 4))
    out = np.zeros(N)
    out[at] = strength * rng.choice([-1, 1], len(at))
    return out


def fading(events, rise_s, size=30000):
    """Impulse envelope: a quick rise and exponential fall for each row (time [s], level [dB], decay [s])."""
    out = np.zeros(N)
    for s, db, decay_s in events:
        near = slice(max(int(s * SR) + 1, 0), int(s * SR) + size)
        t = TIME[near] - s
        out[near] += from_db(db) * (1 - np.exp(-t / rise_s)) * np.exp(-t / decay_s)
    return out


def slow_noise(per_s):
    """Low-passed noise: smooth random wandering at every 40th sample, rms 1."""
    r = np.exp(-80 * np.pi * per_s / SR)
    white = rng.standard_normal(N // 40 + 2002)
    return rms_one(signal.lfilter([1], [1, -2 * r, r * r], white)[2000:])  # drop the filter's start-up


def drift(per_s):
    """Slow noise interpolated to every sample."""
    slow = slow_noise(per_s)
    return np.interp(np.arange(N) / 40, np.arange(len(slow)), slow)


def flicker(per_s, range_db):
    """Amplitude modulation: a gain that wanders within plus and minus the range."""
    return np.repeat(from_db(range_db * np.tanh(slow_noise(per_s))), 40)[:N]


def scene(covered_db=-5.0):
    """Two paths: the train is clear through the air on the left, muffled with floor vibration on the right."""
    rolling = wheels() + contacts() + thuds() + clatters()
    friction = rasps() + chirps() + squeals() + axle_rub()
    train = rolling + friction + motor()
    left = room(train) + hum() + air_drone()
    muffled = from_db(covered_db) * colour(room(train, wet_db=-2.0), COVERED_PORT)
    right = muffled + floor_rumble() + thump()
    return np.array([channel + hiss() for channel in (left, right)])


def record(dry):
    """Elliptic low-pass filter: the top is cut steeply."""
    return signal.sosfilt(signal.ellip(10, .1, 80, CUTOFF_HZ, fs=SR, output="sos"), dry)


dry = scene()
out = record(dry)
generate_wav(out)
```